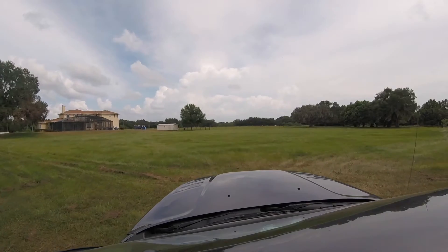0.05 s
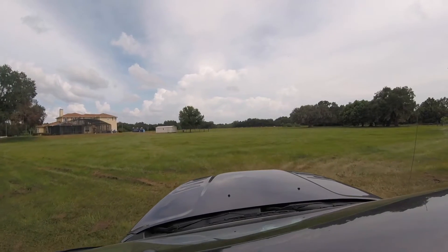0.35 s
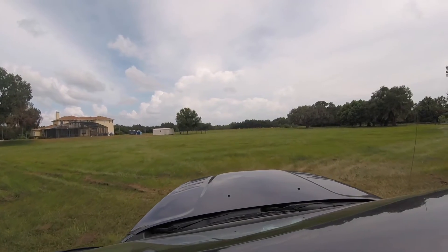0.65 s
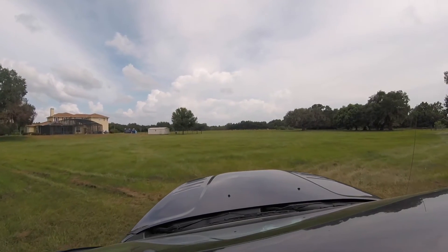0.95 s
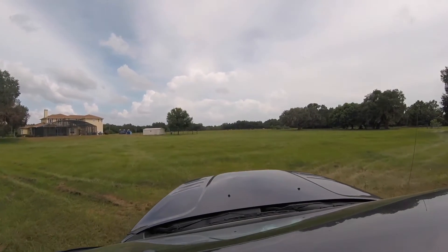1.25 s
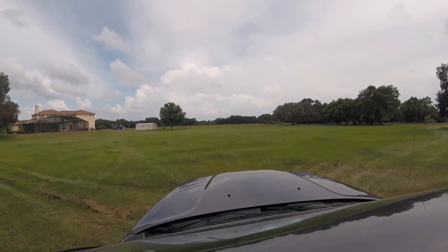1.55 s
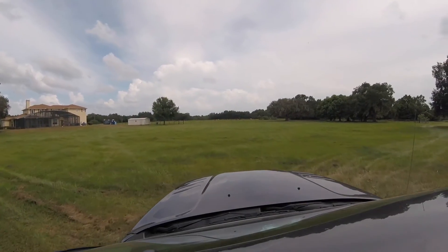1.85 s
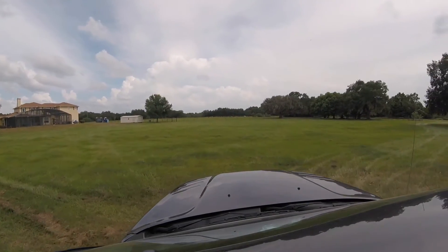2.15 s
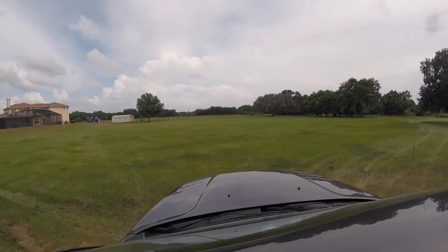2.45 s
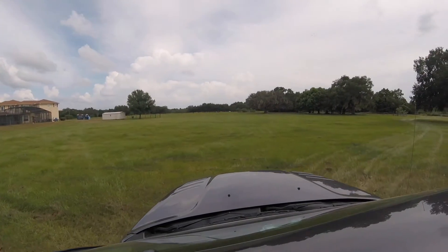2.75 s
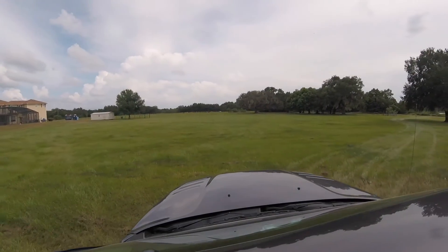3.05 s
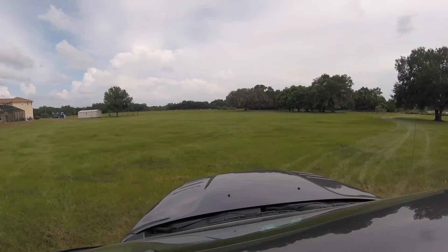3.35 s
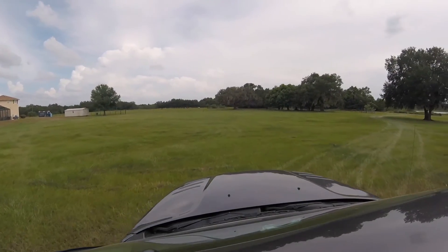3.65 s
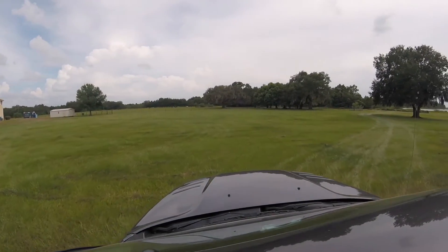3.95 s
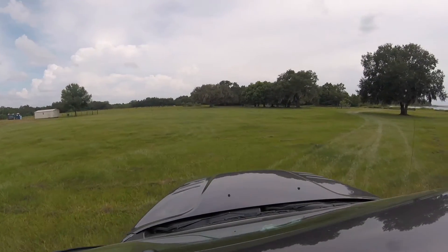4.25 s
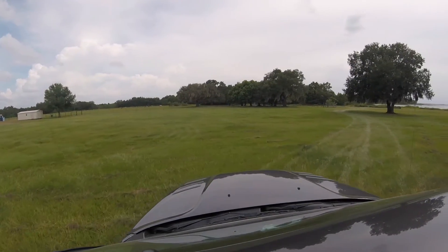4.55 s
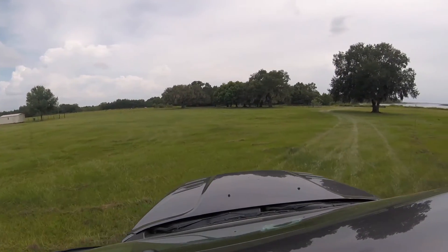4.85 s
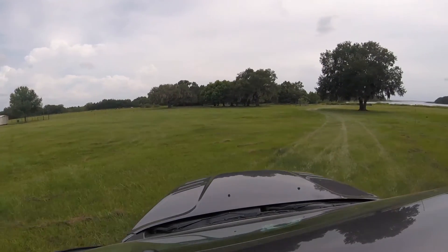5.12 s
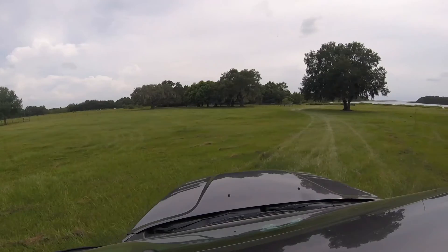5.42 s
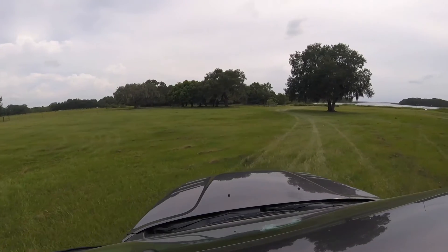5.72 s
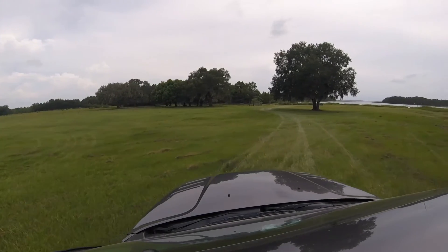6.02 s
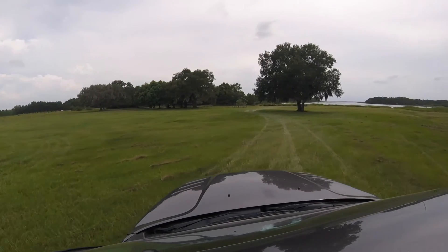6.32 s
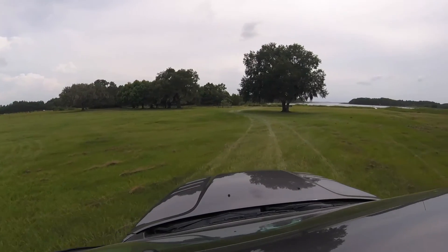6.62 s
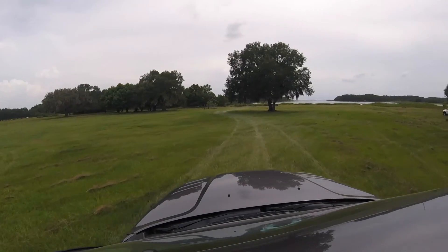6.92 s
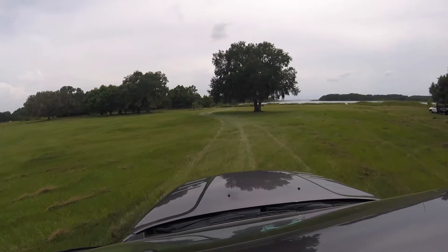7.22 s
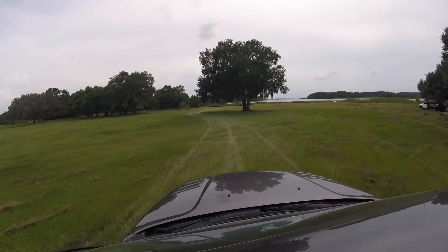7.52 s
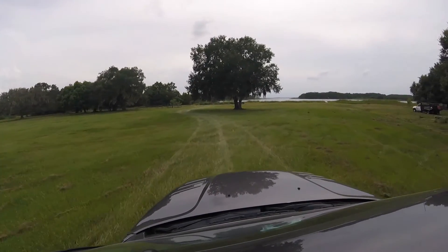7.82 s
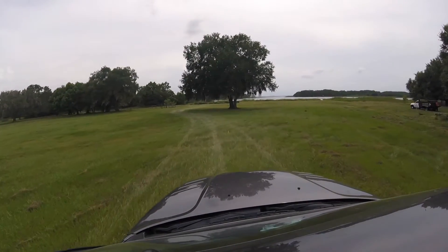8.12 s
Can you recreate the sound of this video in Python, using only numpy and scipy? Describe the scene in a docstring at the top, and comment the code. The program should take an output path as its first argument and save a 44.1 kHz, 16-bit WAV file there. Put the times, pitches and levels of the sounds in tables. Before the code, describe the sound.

A car rolls over a grassy field, heard from a microphone on the outside of its body. From the start, gusts of wind flap, pop and thump on the microphone over a deep rumble and a quiet engine hum. The gusts ease around 1.5 seconds, then hit hardest from 2 to 2.8 seconds, while the engine note drops lower. From 3 to 5 seconds the wind is softer, with scattered dull thumps. From about 4.7 seconds the engine climbs gently in pitch and level, peaking near 7.3 seconds before easing. The rumble and steady wind build with it, and the tyres swish faintly through the grass. Ruts make the body boom at about 5.7, 6.1 and 7.7 seconds, among frequent low thumps that continue to the end at about 8 seconds. A sharp, dry tick sounds at 7.8 seconds.

```python
"""Gusts of wind buffet a microphone on the outside of a vehicle rolling over a grassy field.
Swirls of air (eddies) flap and pop against it, gusting hardest in the first three seconds,
while the body rumbles and thumps over the ground. As the vehicle gathers speed, the engine
note climbs, the tyres swish louder through the grass and a few ruts set the body booming."""
import sys
import numpy as np
from scipy import signal
from scipy.fft import rfft, irfft, next_fast_len
from scipy.io import wavfile
from scipy.ndimage import uniform_filter1d, minimum_filter1d

SR = 44100
rng = np.random.default_rng(int(sys.argv[2]) if len(sys.argv) > 2 else 0)


def int16_out(signal):
    """Quantize to a 16-bit WAV file."""
    q = np.round(np.clip(np.atleast_2d(signal).T, -1, 1) * 32767)
    wavfile.write(sys.argv[1], SR, q.astype(np.int16))


N = 360738
T = np.arange(N) / SR
HZ = np.fft.rfftfreq(N, 1 / SR)


def gain_of(db):
    """Turns decibels into a number to multiply a sound by."""
    return 10 ** (np.asarray(db) / 20)


def evened(x):
    """Scales a signal so that its average size (rms) is 1."""
    return x / np.sqrt(np.mean(x ** 2) + 1e-20)


def curves(rows):
    """Joins the rows of a timetable with straight lines, one curve for each column after the time."""
    times, *columns = np.transpose(rows)
    return [np.interp(T, times, column) for column in columns]


def gain_at(colour, hz):
    """Looks up the gain at hz in a table of frequencies and decibels."""
    freq_hz, db = np.transpose(colour)
    return gain_of(np.interp(np.log(hz + 1), np.log(freq_hz + 1), db))


def noise(gains):
    """Noise of average size 1, coloured by a gain for each frequency."""
    size = next_fast_len(N)
    spectrum = rfft(rng.standard_normal(size)) * np.interp(np.fft.rfftfreq(size, 1 / SR), HZ, gains)
    return evened(irfft(spectrum, size)[:N])


def wander(rate_hz):
    """A random wobble of average size 1, mostly slower than rate_hz."""
    return noise(1 / (1 + (HZ / rate_hz) ** 4))


def steadied(x, span_s):
    """Takes swells slower than span_s out of a noise."""
    window = signal.windows.hann(int(span_s * SR))
    return x / np.sqrt(signal.fftconvolve(x ** 2, window / window.sum(), "same") + 1e-9)


def ringing(pitch_hz, width_hz, level_db):
    """Random shaking keeps a part ringing near its own pitch."""
    return gain_of(level_db) * noise(1 / (1 + ((HZ - pitch_hz) / width_hz) ** 2))


def add(mix, start_s, sound):
    """Lays a sound into the mix at start_s."""
    part = mix[max(round(start_s * SR), 0):][:len(sound)]
    part += sound[:len(part)]


def airflow(attack_s=0.0064, sag_db_per_s=-3.5, release_s=0.023):
    """Gusts build up, sag and die away on top of the steady air stream; their powers add."""
    # gusts: start_s, length_s, buffet_db, rumble_db, tilt_db (per octave; plus = smaller eddies)
    gusts = [(0.0, 0.11, -18, -26.5, -3), (0.114, 0.033, -18.5, -22, 2.5), (.183, 0.018, -19, -18, 0),
             (.203, 0.049, -13.5, -18, 3), (0.303, 0.023, -16.5, -15.5, -1.5),
             (.345, 0.12, -19.5, -17, 2.4), (.466, 0.058, -19, -20.5, 3.5), (.535, 0.061, -17, -20, -0.5),
             (.657, 0.057, -21, -17.5, -2.5), (0.711, 0.09, -20, -20.5, 1.1), (0.821, 0.045, -20.5, -32, 0),
             (.993, 0.007, -29, -21, 4.5), (1.037, 0.04, -22.5, -28, -3), (1.119, 0.04, -19.5, -29, 0),
             (1.189, 0.097, -21, -34, -0.5), (1.334, 0.012, -18, -30, 0), (1.483, 0.066, -24.5, -36, 1),
             (1.621, 0.019, -28, -42, 6), (1.674, 0.0095, -28, -24, 7.5), (1.763, 0.012, -28, -22, 8),
             (2.029, 0.03, -15, -16, 3), (2.07, 0.032, -13.5, -20, 3.5), (2.126, .08, -15, -22, 4.5),
             (2.215, 0.057, -12.5, -22, 2), (2.279, 0.055, -14, -20, 2.5), (2.33, 0.081, -11.5, -17, 3.5),
             (2.43, 0.097, -16, -16, 4.5), (2.535, 0.05, -18, -22, 2.5), (2.601, 0.176, -20.5, -28.5, 2.5),
             (2.828, 0.0092, -21, -32.5, 3.5), (2.873, 0.017, -21, -28, .5),
             (2.922, 0.028, -20.5, -25, -0.5), (3.228, 0.011, -23.5, -21.5, 0.5),
             (3.289, 0.068, -28, -27.5, 4.5), (3.41, 0.017, -24.5, -26, 2), (3.535, 0.22, -31.5, -25, -5),
             (3.799, .15, -29.5, -24, -1.5), (4.357, 0.1, -31, -20.5, 1.5), (4.9, 0.073, -27.5, -28, -3.5),
             (5.01, .18, -31.5, -26, -6), (6.96, .12, -30, -35, -1), (7.82, .07, -33, -30, -2)]
    # air streaming past the moving vehicle: time_s, level_db
    headwind = [(0, -37), (1.65, -34), (1.9, -32.5), (3.1, -41), (4.2, -36), (4.75, -33.5), (5.1, -31.5),
                (5.58, -30), (5.75, -26), (6.5, -29), (7.1, -26), (8.18, -28)]
    stream_db, = curves(headwind)
    buffet_power = gain_of(stream_db - 5) ** 2
    rumble_power = gain_of(stream_db + 6.5) ** 2
    tilt_sum = -2 * buffet_power  # the stream leans dull, by 2 dB per octave
    for start_s, length_s, buffet_db, rumble_db, tilt_db in gusts:
        age = np.maximum(T - start_s, 0)
        shape = np.minimum(age / attack_s, 1) * np.exp(-np.maximum(age - length_s, 0) / release_s)
        power = (shape * gain_of(sag_db_per_s * np.minimum(age, length_s))) ** 2
        blast = power * gain_of(buffet_db) ** 2
        buffet_power += blast
        rumble_power += power * gain_of(rumble_db) ** 2
        tilt_sum += tilt_db * blast
    return np.sqrt(buffet_power), np.sqrt(rumble_power), tilt_sum / buffet_power


def buffet(strength, tilt_db, level_db=1.5, middle_hz=180, lumpy_db=2, crackle_db=2.5, flap_db=1.3):
    """Eddies strike the microphone in uneven flaps; the smaller they are, the brighter they sound."""
    # tone colour of the eddies: frequency_hz, level_db
    colour = [(30, -11), (70, 0), (120, 3), (200, 0.5), (320, -4.5), (400, -9.5), (520, -16.5),
              (800, -29.5), (1300, -40), (2200, -54), (4000, -67.5), (8000, -85.5)]
    eddies = noise(gain_at(colour, HZ)) * gain_of(lumpy_db * wander(rate_hz=45))
    spectrum = rfft(steadied(eddies, span_s=0.045))
    octave = np.log2((HZ + 1) / middle_hz)
    # small eddies come in bursts a few milliseconds long, the more so the harder it blows
    force = np.sqrt(np.minimum(strength / gain_of(-15), 1))
    bursts = force * (np.minimum(noise(HZ / (1 + (HZ / 80) ** 3)), 2) - 0.5)
    out = np.zeros(N)
    for step in range(-3, 6):
        band = irfft(spectrum * np.maximum(1 - abs(octave - step), 0), N)
        smallness = np.clip(step, -1, 2)
        out += band * gain_of(smallness * tilt_db + max(smallness, 0) / 2 * crackle_db * bursts)
    flaps = noise(np.exp(-2 * np.log2((HZ + 1) / 16) ** 2))  # about 16 a second
    return out * strength * gain_of(level_db + flap_db * steadied(flaps, span_s=0.27))


def rumble(strength, level_db=0.5, jolt_db=2.5):
    """Large eddies rumble, and uneven ground jolts the body so that it booms."""
    # tone colour of the large eddies: frequency_hz, level_db
    colour = [(5, -20.5), (15, -13), (26, -1), (40, -1.5), (50, -3), (62, -3), (90, -8.5), (140, -12.5),
              (300, -37), (900, -91.5)]
    boom = ringing(pitch_hz=50, width_hz=4, level_db=-8)
    shake = (noise(gain_at(colour, HZ)) + boom) * gain_of(jolt_db * wander(rate_hz=9))
    return strength * gain_of(level_db) * steadied(shake, span_s=0.3)


def engine(level_db=1, flutter_db=0.7, waver=0.0015, jitter_cycles=0.016, rasp_db=2.2):
    """The engine note wavers as the vehicle bounces, over a low drone of the body."""
    # how fast and hard the engine works: time_s, pitch_hz, load_db
    effort = [(0, 247.3, -38.5), (1.0, 241, -40), (1.6, 236.6, -39.5), (1.9, 195.7, -34), (2.8, 196.8, -32),
              (3.1, 196.3, -39.5), (3.38, 205.8, -34.5), (3.7, 195.2, -33.5), (4.0, 188, -34.5),
              (4.45, 181.5, -38), (4.72, 208, -31.5), (4.98, 216.2, -34), (6.45, 227, -31),
              (6.85, 240, -28), (7.15, 253.6, -29.5), (7.37, 258.8, -29.5), (7.8, 231.4, -33),
              (8.18, 226.6, -36)]
    # how well sound gets from engine to microphone: frequency_hz, gain_db
    path = [(180, -0.5), (215, -2.5), (250, -4), (380, -23.5), (415, -18), (445, -9.5), (480, -12),
            (510, -16.5), (545, -15), (600, -17), (660, -19), (712, -16), (742, -20), (780, -23.5),
            (880, -20), (1030, -18)]
    # tones in the note (uneven cylinders add the in-between one): multiple of the pitch
    multiples = [1, 1.25, 2, 3, 4]
    # strength of each of those tones: level_db
    tone_levels = [-0.25, -15, -0.2, 0, -8.5]
    pitch_hz, load_db = curves(effort)
    cycles = np.cumsum(pitch_hz * (1 + waver * wander(rate_hz=9.67))) / SR
    # uneven firing shifts the timing and makes the higher tones rasp
    cycles += jitter_cycles * wander(rate_hz=35)
    rasp = gain_of(rasp_db * wander(rate_hz=40))
    note = np.zeros(N)
    for multiple, db in zip(multiples, tone_levels):
        flutter = gain_of(db + flutter_db * wander(rate_hz=23)) * evened(rasp ** min(multiple - 1, 1.5))
        tone = np.sin(2 * np.pi * (multiple * cycles + rng.random()))
        note += gain_at(path, multiple * pitch_hz) * flutter * tone
    drone = ringing(pitch_hz=165, width_hz=12, level_db=-6)
    return gain_of(load_db) * (np.sqrt(2) * gain_of(level_db) * note + drone)


def grass_and_hiss(grain_db=0.5, flicker_db=0.25, roar_hz=1300, roar_octaves=0.32, roar_growth=1.7):
    """Tyres swish and roar through the grass and ring the panels, over the microphone's own hiss."""
    # loudness of the grass swish and the microphone hiss: time_s, swish_db, hiss_db
    # (both dip where strong gusts turn the recorder's gain down)
    levels = [(0.0, -55.5, -61), (0.22, -57, -62), (0.35, -60, -66.5), (1.1, -58, -62), (1.6, -56, -60.5),
              (2.2, -61.5, -62), (2.56, -63.5, -67.5), (3.58, -60.5, -62.5), (4.46, -59.5, -61.5),
              (4.85, -56, -60.5), (6.28, -54, -59), (7.25, -50.5, -59), (7.76, -52, -58.5),
              (7.83, -56.5, -64.5), (8.18, -55, -58.5)]
    # tone colours of the grass swish and the microphone hiss: frequency_hz, level_db
    swish_colour = [(80, 32.5), (300, 28.5), (400, 19.5), (500, 23.5), (720, 20.5), (950, 14), (1280, 12),
                    (1650, 9), (2300, 5.5), (3200, 2.5), (4200, -1), (5200, -8.5), (7000, -16.5),
                    (12000, -42.5)]
    hiss_colour = [(2000, -6), (5200, -11), (6150, 1.5), (6480, 7), (6800, -2), (8000, -6.5), (9200, -10),
                   (10200, -19.5), (11300, -13.5), (12800, -18), (14000, -29)]
    # ringing body panels: pitch_hz, width_hz, level_db (compared with swish_db)
    panels = [(458.7, 8.9, 2.5), (583, 14, 0), (1129, 33, -2.5), (1225, 9.8, -2.5), (1292, 54, -3)]
    swish_db, hiss_db = curves(levels)
    gains = gain_at(swish_colour, HZ)
    treble = (HZ > 2500) & (HZ < 5000)  # swish_db sets the level of this band
    swish = noise(gains) * np.linalg.norm(gains) / np.linalg.norm(gains[treble])
    blades = gain_of(grain_db * wander(rate_hz=130) + flicker_db * wander(rate_hz=23))
    ring = sum(ringing(*panel) for panel in panels)
    # the roar of the tread grows faster with speed than the swish
    roar_db = -47 + roar_growth * (swish_db - swish_db.max()) + wander(rate_hz=12)
    roar = gain_of(roar_db) * noise(1 / (1 + (np.log2((HZ + 1) / roar_hz) / roar_octaves) ** 2))
    mic_hiss = gain_of(hiss_db - 1) * noise(gain_at(hiss_colour, HZ))
    return roar + gain_of(swish_db) * (swish * blades + ring) + mic_hiss


def ticks(fall_s=0.00054, dull_hz=7000):
    """Each small, dry tick is a quick step of pressure that leaks away."""
    # sharp ticks: start_s, level_db
    clicks = [(.164, -28), (.260, -32), (2.348, -34), (2.468, -24.5), (7.780, -17)]
    out, t = np.zeros(N), np.arange(SR // 100) / SR
    for start_s, db in clicks:
        add(out, start_s, gain_of(db) * np.exp(-t / fall_s))
    return signal.sosfilt(signal.butter(2, dull_hz, fs=SR, output="sos"), out)


def pops(spread=7.1, dull_hz=2600):
    """A tight eddy crosses the microphone's opening: a pressure spike inside a wide, shallow dip."""
    # pops of wind: time_s, level_db, width_s
    eddies = [(0.309, -11, .0008), (.388, -4, 0.0016), (.739, -11, 0.0011), (.799, -9.5, 0.002),
              (1.141, -12, 0.0017), (1.264, -12, 0.0017), (1.350, -17, 0.0015), (1.495, -8, 0.0018),
              (1.7823, -2.5, 0.00099), (2.166, -7, .0005), (2.244, -10, .0006), (2.499, -10.5, 0.00035),
              (3.349, -15, 0.00074), (3.826, -13.5, 0.00078)]
    out, t = np.zeros(N), np.arange(-SR // 40, SR // 40) / SR
    for time_s, db, width_s in eddies:
        spike = np.exp(-abs(t) / width_s) - np.exp(-abs(t) / (spread * width_s)) / spread
        add(out, time_s + t[0], gain_of(db) * spike / spike.max())
    return signal.sosfilt(signal.butter(3, dull_hz, fs=SR, output="sos"), out)


def thumps(level_db=-1, rise_cycles=0.43, grit_hz=900, crackle_per_hz=0.00036):
    """Each thump is a push of pressure that swings back and dies within a cycle or two."""
    # the hardest thumps of air and body: peak_s, level_db, pitch_hz
    blows = [(0.319, -5, 101), (.722, -6, 119), (.790, -4.5, 101), (1.127, -10.5, 63.7), (1.398, -5, 66.3),
             (1.691, -6.5, 152), (1.974, -14, 130), (2.036, -4, 112.4), (2.349, -15, 223),
             (2.509, -3.5, 180), (2.776, -11, 140), (3.304, -10, 105.7), (3.624, -13.5, 85.3),
             (3.866, -13.5, 59.7), (4.369, -7.5, 58.2), (4.425, -8, 47.6), (4.577, -11.5, 80.6),
             (5.151, -8, 149), (5.347, -11.5, 59), (5.929, -7.5, 65), (6.24, -7, 111.1), (6.512, -7.5, 42),
             (6.632, -5.5, 87.5), (6.746, -5.5, 68.5), (6.791, -2.5, 150), (6.995, -10, 120.8),
             (7.494, -8, 100), (7.54, -8.5, 54.5), (7.713, -7.5, 64.5), (7.84, -5, 72.5), (8.013, -7, 75.4),
             (8.133, -10, 120.7)]
    out, t = np.zeros(N), np.arange(SR // 8) / SR
    grit = noise(1 / (1 + (HZ / grit_hz) ** 3))
    for peak_s, db, hz in blows:
        rise_s = rise_cycles / hz
        shape = (t / rise_s * np.exp(1 - t / rise_s)) ** 2
        # quicker thumps crackle more
        crackle = crackle_per_hz * hz * np.roll(grit, rng.integers(N))[:len(t)]
        swing = np.sin(2 * np.pi * hz * t) + crackle
        add(out, peak_s - rise_s, gain_of(db + level_db) * shape * swing)
    return out


def whine(start_s=2.9, end_s=4.4, fade_s=0.2):
    """The parts that drive the wheels whine faintly while the vehicle coasts."""
    fade = np.clip(np.minimum(T - start_s, end_s - T) / fade_s, 0, 1)
    return fade * ringing(pitch_hz=823, width_hz=5, level_db=-58)


def brush(peak_s=4.315, swell_s=0.07, level_db=-59.5, centre_hz=5200, width_hz=1700):
    """A tall tuft sweeps briefly along the body."""
    swell = np.exp(-((T - peak_s) / swell_s) ** 2)
    return gain_of(level_db) * swell * noise(np.exp(-((HZ - centre_hz) / width_hz) ** 2))


def ruts(ring_hz=50, swell_s=0.037):
    """A wheel drops into a rut and the body rings for a few slow cycles."""
    # wheel drops: start_s, level_db
    drops = [(5.695, -12), (6.125, -11.5), (7.691, -13)]
    out, t = np.zeros(N), np.arange(SR // 2) / SR
    boom = t / swell_s * np.exp(1 - t / swell_s) * np.sin(2 * np.pi * ring_hz * t)
    for start_s, db in drops:
        add(out, start_s, gain_of(db) * boom)
    return out


def scene():
    """Wind and vehicle meet at one microphone."""
    buffet_strength, rumble_strength, tilt_db = airflow()
    wind = buffet(buffet_strength, tilt_db) + rumble(rumble_strength) + thumps() + pops()
    return (wind + engine() + whine() + grass_and_hiss() + brush() + ruts() + ticks())[None]


def record(dry):
    """A limiter turns down the hardest blasts, the ends fade and the highest treble is cut."""
    ceiling, fade_s, top_hz = 0.8, 0.004, 13900
    allowed_gain = np.minimum(ceiling / (abs(dry) + 1e-9), 1)
    gain = uniform_filter1d(minimum_filter1d(allowed_gain, size=441), size=441)  # smooth over 10 ms
    fade = np.minimum(np.minimum(T, T[-1] - T) / fade_s, 1)
    treble_cut = signal.firwin(511, top_hz, window=("kaiser", 9), fs=SR)
    return signal.oaconvolve(dry * gain * fade, treble_cut[None], "same")


dry = scene()
out = record(dry)
int16_out(out)
```